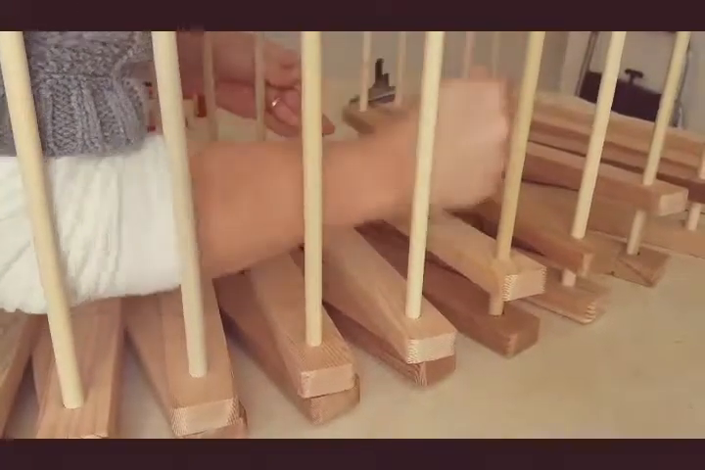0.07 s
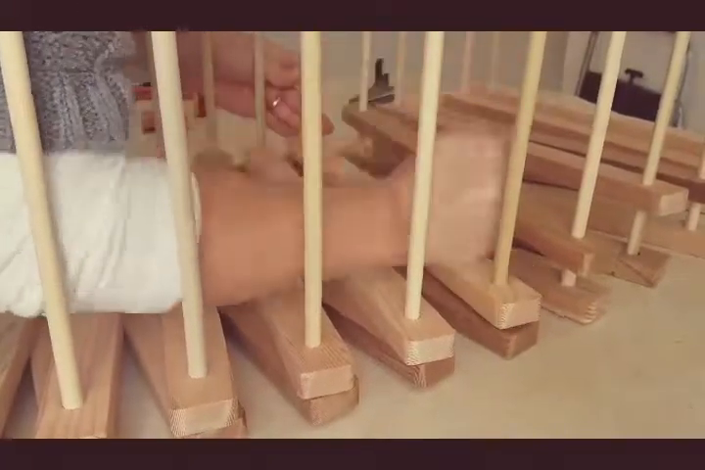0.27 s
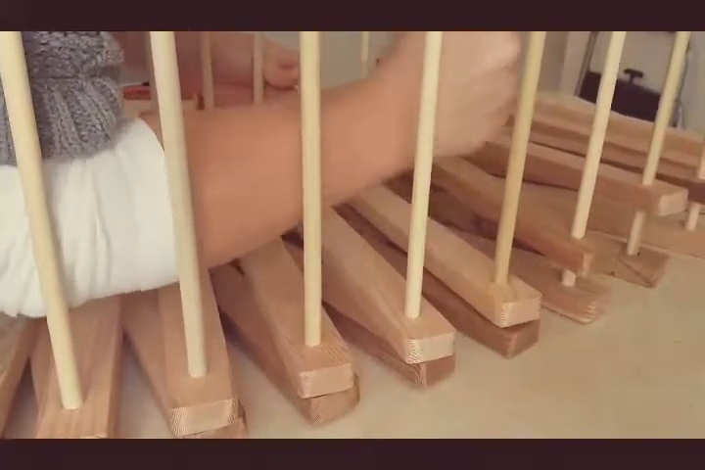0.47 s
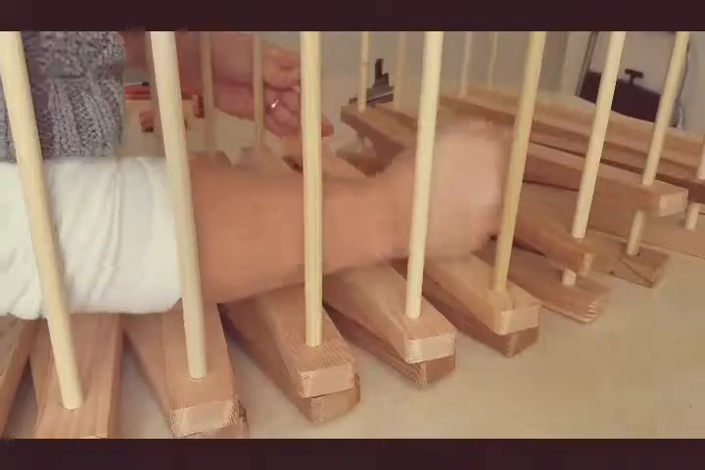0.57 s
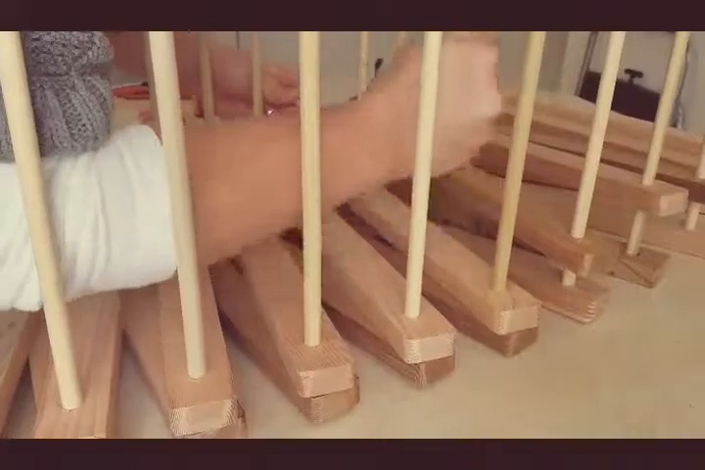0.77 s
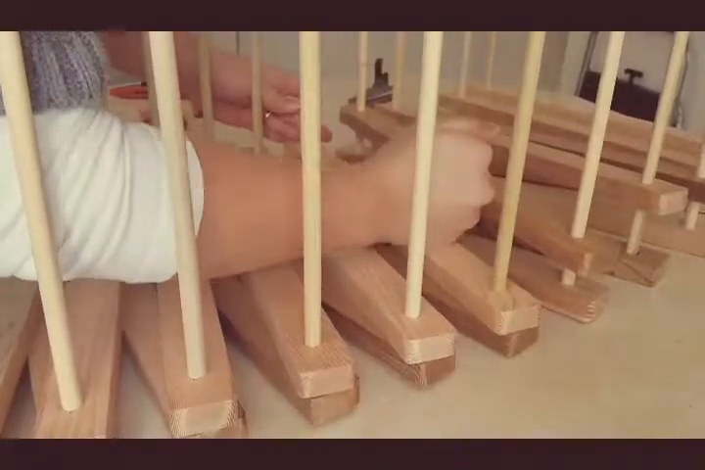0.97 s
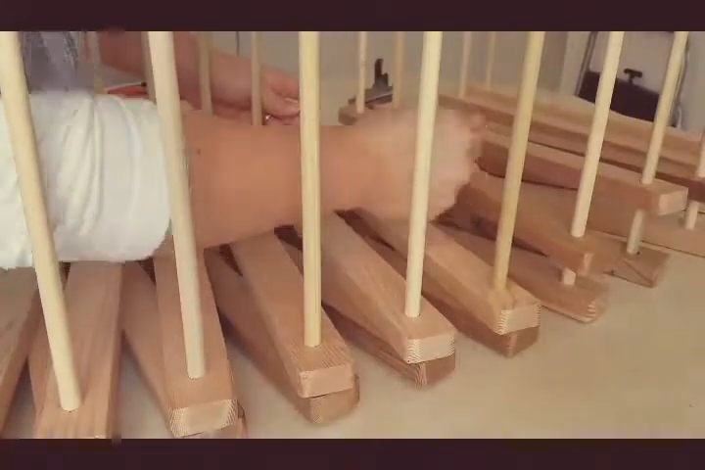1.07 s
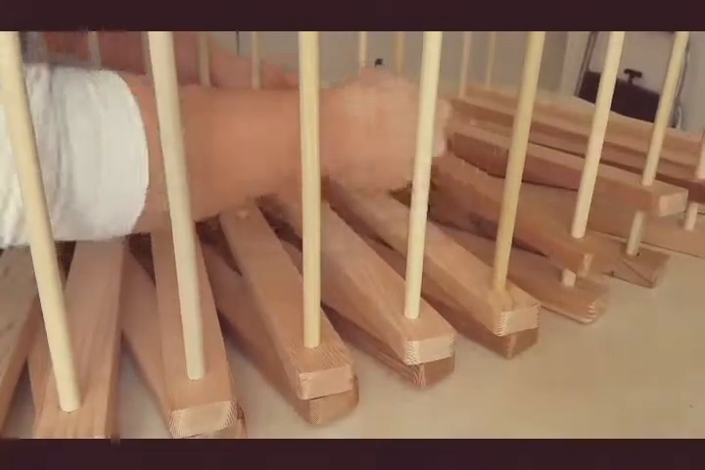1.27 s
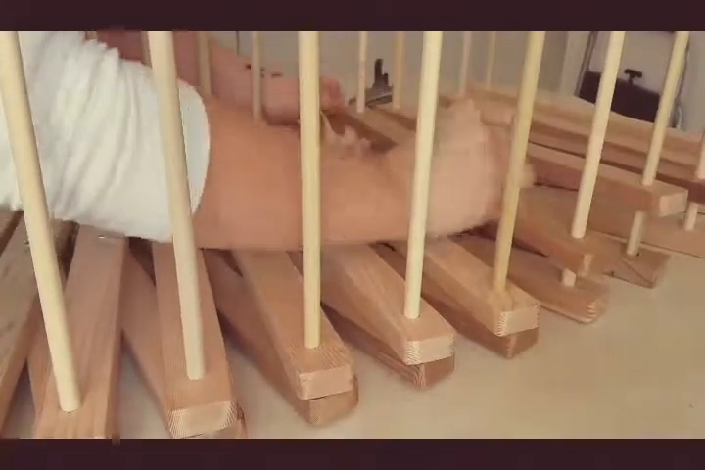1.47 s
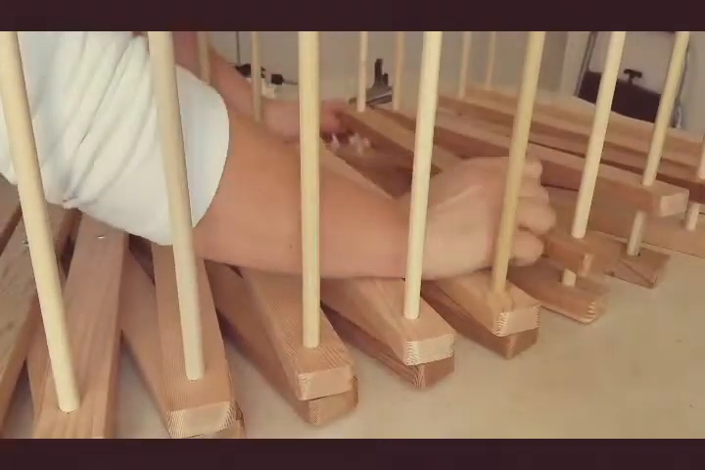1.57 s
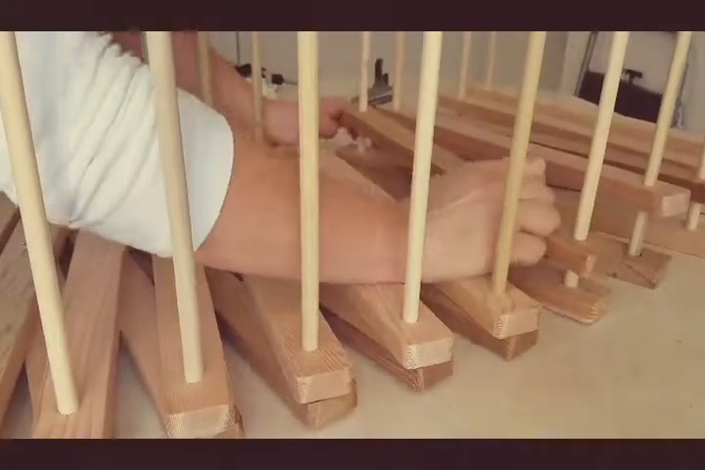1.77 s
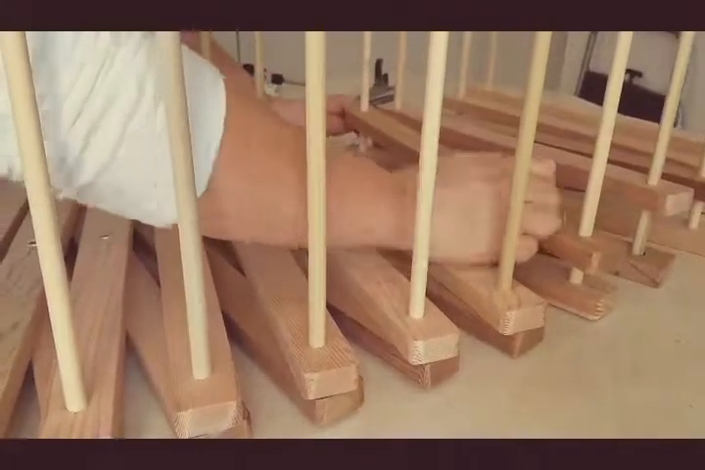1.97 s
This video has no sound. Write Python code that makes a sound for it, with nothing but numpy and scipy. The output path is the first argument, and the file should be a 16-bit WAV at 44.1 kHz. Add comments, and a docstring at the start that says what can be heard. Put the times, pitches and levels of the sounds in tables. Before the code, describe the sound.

Hard wooden clacks of bars knocked into place on a bench. A faint knock tail, soft rubbing and tiny metal clink open the moment. Sharp, hollow blows land at 0.24, 0.50, 0.72 and 1.01 seconds, the middle two loudest, the fourth brighter. A duller, fumbled cluster comes at 1.31-1.36. Near quiet follows, with barely audible touches, then slight sliding at 2.0 and a soft knock at 2.03. Close stereo, small live room.

```python
"""Wooden rack arms knocked into place

Wooden rack arms are knocked into place on a workbench in a small, live workshop: four sharp clacks and
a duller, fumbled knock, with fainter blows around them. Each blow is a snap, a short noise crack, ringing
modes of the arms and bench top, and a dense noise wash. A small metal fitting clinks as a set of decaying
sines; shifted parts slide and brush as coloured noise over the quiet room."""
import sys
import numpy as np
from scipy import signal
from scipy.fft import rfft, irfft, next_fast_len
from scipy.io import wavfile
from scipy.ndimage import uniform_filter1d

SR = 44100
rng = np.random.default_rng(int(sys.argv[2]) if len(sys.argv) > 2 else 0)


def wrap_up_sound(samples):
    """Save the sound to the file named by the first command line argument, as 16-bit audio."""
    columns = np.atleast_2d(samples).T
    # keep every value between -1 and 1, then stretch to whole-number steps
    tamed = np.clip(columns, -1, 1)
    steps = np.round(tamed * 32767).astype(np.int16)
    wavfile.write(sys.argv[1], SR, steps)


N = 90405

# Blows on the rack. Each row: start in seconds, level in dB, then bass, low mids, upper mids, treble and
# top in dB against the body, crack in dB against the wash, ring length as a factor.
KNOCKS = [(-.04, -31, -4, 10.5, 1.5, 3, 1, -11, 0.95), (.028, -38, 6, 9.5, 6, 21, 7.5, -12, 1.2),
          (0.2425, 0.5, -2.5, 4.5, -1.1, -4.5, -0.5, 0.5, 0.98),
          (0.5014, 3.5, -4, 2.6, -4, -6.5, -8.5, 1.5, 0.88), (0.7241, 3, 1.5, -2, -2.7, -4.9, -3, -2, 0.95),
          (1.0088, -2.5, -3, 1, 7.5, 6.5, 9.5, -0.5, 0.92), (1.3127, -23.5, 3, 1, 5, 6, 4, -15, 0.6),
          (1.3204, -8, -1, 1.5, 1.5, -9, -5, -11, 0.92), (1.3274, -12, 13.5, 5.5, -6, -8, -14, 8, 0.75),
          (1.3631, -22.5, 12.5, 5.5, 3.5, -6, -8, 10, 0.57),
          (1.593, -42.5, 14.5, 14, -10, -9.5, -7.5, -3, 0.91), (1.647, -48, 12, 2, -5, -5, -3, -7, 1.6),
          (2.034, -17, 7, 2.5, -3.5, -16, -10.5, -6.3, 0.58)]
# Tone centres of a blow, in Hz: bass, low mids, body, upper mids, treble, top.
COLOUR_HZ = [125, 250, 500, 1800, 4500, 11000]
# Ringing of the arms and the bench top. Each row: pitch in Hz, level in dB, t60 in seconds at ring length 1.
WOOD_MODES = [(127, -16, 0.31), (161.1, -25, 0.37), (261.8, -20, 0.2), (342.3, -19, 0.24),
              (381.1, -24, 0.47), (473, -19, 0.38), (530.8, -17.5, 0.38), (566, -19.5, 0.22),
              (649.3, -16, 0.25), (719, -20, 0.34), (799, -18.5, .23), (924, -26, .27), (961, -29, .4),
              (1768, -32, .34), (2203, -32, 0.24), (2354, -31, .3)]
# Dense wash of higher modes and room. Each row: frequency in Hz, gain in dB.
WASH = [(30, 4), (60, -1.5), (95, 24), (150, 16), (210, 27.5), (320, 31.5), (430, 18), (580, 35), (850, 28),
        (1200, 25.5), (1600, 22.5), (2300, 21.5), (3000, 12), (4800, 7.5), (7000, -4), (10000, -2),
        (14500, -17)]
# Decay of the wash. Each row: frequency in Hz, t60 in seconds at ring length 1.
WASH_T60 = [(60, 0.95), (160, 0.47), (420, 0.38), (1100, 0.41), (2400, 0.38), (4000, 0.3), (8000, .33),
            (14000, 0.11)]
# Crack of the contact itself. Each row: frequency in Hz, gain in dB.
CRACK = [(100, 11.5), (400, 28), (800, 19.5), (1300, 20.5), (2200, 10.5), (4000, 5), (8000, -9.5),
         (14000, -12)]
# Stereo likeness. Each row: frequency in Hz, left-right correlation from -1 to 1.
LIKENESS = [(60, 1), (140, 0.96), (260, 0.99), (550, 0.71), (1000, 0.22), (2000, -0.06), (4000, 0.13),
            (12000, -0.055)]
# Stereo balance. Each row: frequency in Hz, left minus right in dB.
BALANCE_DB = [(60, -2.5), (300, -3), (650, -0.5), (1000, -1.5), (2000, 3.5), (4000, 0.7), (12000, 0.7)]
# Touches on the fitting. Each row: start in seconds, level in dB, loss in dB per octave away from its
# main mode (a negative loss is a lift).
CLINKS = [(.033, -46, -5), (1.840, -62.5, 12)]
# Ringing of the metal fitting. Each row: pitch in Hz, level in dB, t60 in seconds.
FITTING_MODES = [(740, 3, 0.15), (954, -7, 0.25), (1680, -4.5, 0.4), (1760, -9.5, 0.34), (2275, -6.5, .12),
                 (2420, -3, .14), (2290, 7, 0.32), (3180, -7, .12), (4000, -6, 0.14), (4460, -17, 0.11),
                 (4740, -6, 0.19)]
# Wood sliding on wood. Each row: time in seconds, level in dB.
SLIDE = [(0, -62), (.045, -40), (.13, -82), (.23, -56.5), (.3, -53), (1.55, -65), (1.66, -66.5),
         (1.8, -62.5), (1.95, -68.5), (1.99, -53.5), (2.025, -44.5), (2.05, -53)]
# Tone of the slide. Each row: frequency in Hz, relative density in dB per Hz.
SLIDE_COLOUR = [(30, -11), (200, 4), (700, -3), (1400, -9), (2500, -9), (4000, -14.5), (7000, -28.5),
                (12000, -18.5), (15000, -29.5)]
# A light, high brushing. Each row: time in seconds, level in dB.
BRUSH = [(0, -59), (.07, -52), (.14, -69.5), (.22, -64), (.38, -68), (.46, -61), (.52, -80), (1.95, -91.5),
         (1.99, -68), (2.05, -62)]
# Tone of the brushing. Each row: frequency in Hz, relative density in dB per Hz.
BRUSH_COLOUR = [(30, -17.5), (2000, -16), (4500, 2.5), (7500, 2.5), (10000, 1.5), (14500, 3)]
# Tone of the quiet room. Each row: frequency in Hz, relative density in dB per Hz.
FLOOR = [(30, -12), (80, -1), (130, 9), (200, 1.5), (400, -17.5), (1000, -13), (2400, -18), (4000, -30.5),
         (14000, -30.5)]

FLOOR_DB = -60  # rms
FITTING_MAIN_HZ = 2450
LOW_CUT_HZ, CUTOFF_HZ = 26, 14900
MODE_BUILD_CYCLES, WASH_BUILD_CYCLES = 0.52, 0.29
MODE_SCATTER_DB = 1.8  # random spread of mode levels from blow to blow
MODE_WIDTH = 0.35  # how far the phases at the two microphones part
TYPICAL_T60_S = 0.4  # the decay that a ring length scales
CRACK_T60_S = 0.0023
CRACK_CYCLES = 15  # every band of the crack lasts this many cycles longer, so low notes hang on most
EVEN_OVER_HZ = 22  # width over which the wash is evened out
SNAP_DB = -2
SNAP_LOW_HZ, SNAP_HIGH_HZ, SNAP_DULL_HZ = 750, 2260, 6500
SNAP_FULL_DB, SNAP_SOFTENING = -2, 0.6  # below this level a blow loses this many more dB of snap per dB
SNAP_LAG_S = 0.0001  # the left microphone hears it later

T = np.arange(N) / SR
TAIL = T[:int(0.55 * SR)]  # time axis of one ringing sound

# third-octave bands, and their power responses for the evened wash
EDGES = 28 * 2 ** (np.arange(29) / 3)
CENTRES = np.sqrt(EDGES[1:] * EDGES[:-1])
BANDS = [signal.butter(2, EDGES[k:k + 2], "band", fs=SR, output="sos") for k in range(len(CENTRES))]
FFT_SIZE = next_fast_len(len(TAIL) + SR // 8, True)
FFT_HZ = np.fft.rfftfreq(FFT_SIZE, 1 / SR)
BAND_SHAPES = [np.abs(signal.sosfreqz(sos, FFT_HZ, fs=SR)[1]) ** 2 for sos in BANDS]


def from_db(db):
    """Decibels to gain."""
    return 10 ** (np.asarray(db) / 20)


def at_hz(points, hz):
    """Read a table on a log-frequency axis."""
    f, v = np.transpose(points)
    return np.interp(np.log(hz), np.log(f), v)


def panned(db):
    """Left and right gains for a level difference."""
    return from_db(np.array([[db], [-db]]) / 2)


def unit(x):
    """Scale to energy 1."""
    return x / np.sqrt(np.sum(x ** 2) + 1e-20)


def dying(t60):
    """Exponential decay: 60 dB down after t60 seconds."""
    return np.exp(-np.log(1000) * TAIL / t60)


def swelling(hz, cycles):
    """A resonance builds up over a time set in cycles of its pitch."""
    return 1 - np.exp(-TAIL * hz / cycles)


def add(out, start_s, sound):
    """Mix a sound in at a time, trimmed to the scene."""
    i = int(round(start_s * SR))
    a, b = max(i, 0), min(i + sound.shape[-1], N)
    if b > a:
        out[:, a:b] += sound[:, a - i:b - i]


def band_noise(k, size):
    """Two unrelated noises in third-octave band k."""
    steep_band = np.vstack([BANDS[k], BANDS[k]])
    settling = SR // 8
    noise = rng.standard_normal((2, size + settling))
    return signal.sosfilt(steep_band, noise)[:, -size:]


def stereo(pair, hz):
    """Turn two noises into left and right, alike in the bass and mostly unrelated in the treble."""
    alike = np.clip(at_hz(LIKENESS, hz), -0.99, 0.99)
    mid = np.sqrt((1 + alike) / 2) * unit(pair[0])
    side = np.sqrt((1 - alike) / 2) * unit(pair[1])
    return np.array([mid + side, mid - side]) * panned(at_hz(BALANCE_DB, hz))


def ring(hz, t60, spread):
    """One decaying mode, reaching the two microphones in different phases."""
    parting = spread * rng.choice([-1, 1]) * np.array([[1], [-1]])
    phase = rng.uniform(0, 2 * np.pi) + parting
    return np.sin(2 * np.pi * hz * TAIL + phase) * dying(t60) * swelling(hz, MODE_BUILD_CYCLES)


def hiss(bands, colour):
    """Steady stereo noise of a given colour, rms 1 over both channels."""
    band_gains = from_db(at_hz(colour, CENTRES)) * np.sqrt(CENTRES)  # wider bands hold more energy
    return unit(np.tensordot(band_gains, bands, 1)) * np.sqrt(2 * N)


def background():
    """Soft friction noise as parts are shifted, over the quiet room."""
    bands = np.array([stereo(band_noise(k, N), hz) for k, hz in enumerate(CENTRES)])
    # one noise serves three layers: played backwards, shifted by half, and straight
    slide_noise = hiss(bands, SLIDE_COLOUR)[:, ::-1]
    brush_noise = np.roll(hiss(bands, BRUSH_COLOUR), N // 2, axis=1)
    slide = from_db(np.interp(T, *np.transpose(SLIDE))) * slide_noise
    brush = from_db(np.interp(T, *np.transpose(BRUSH))) * brush_noise
    return slide + brush + from_db(FLOOR_DB) * hiss(bands, FLOOR)


def fitting():
    """Light touches ring a small metal part; the lightest wakes little but the modes near its main one."""
    out = np.zeros((2, N))
    for start_s, db, loss_db in CLINKS:
        for hz, mode_db, t60 in FITTING_MODES:
            octaves_away = abs(np.log2(hz / FITTING_MAIN_HZ))
            gain = from_db(db + mode_db - loss_db * octaves_away)
            add(out, start_s, gain * ring(hz, t60, spread=0.35))
    return out


def strength(knock, hz):
    """How strongly a blow drives a frequency: hard contacts are bright, soft ones boom."""
    _, db, bass_db, low_mids_db, upper_mids_db, treble_db, top_db, _, _ = knock
    colour_db = [bass_db, low_mids_db, 0, upper_mids_db, treble_db, top_db]
    return from_db(db + np.interp(np.log(hz), np.log(COLOUR_HZ), colour_db))


def damping(length):
    """Change in decay for a part held more or less firmly: below 1 rings shorter, above 1 longer."""
    return dying(TYPICAL_T60_S) ** (1 / np.clip(length, 0.4, 1.5) - 1)


def evened(pair, k):
    """Spread a band's energy evenly over its pitches, so that no chance note stands out."""
    spectrum = rfft(pair, FFT_SIZE)
    width = int(EVEN_OVER_HZ * FFT_SIZE / SR)
    power = uniform_filter1d(np.abs(spectrum) ** 2, size=width, axis=-1)
    level = np.sqrt(np.abs(power) + 1e-9 * power.max())
    return irfft(spectrum * BAND_SHAPES[k] / level, FFT_SIZE)[:, :len(TAIL)]


def burst(k, envelope, even=False):
    """Stereo noise in band k under an envelope, with energy in proportion to the bandwidth."""
    pair = band_noise(k, len(TAIL)) * envelope
    if even:
        pair = evened(pair, k) * swelling(CENTRES[k], WASH_BUILD_CYCLES)
    bandwidth = EDGES[k + 1] - EDGES[k]
    return np.sqrt(2 * bandwidth / SR) * stereo(pair, CENTRES[k])


def wash():
    """Dense modes dying in the room, band by band."""
    bands = []
    for k, hz in enumerate(CENTRES):
        bands.append(from_db(at_hz(WASH, hz)) * burst(k, dying(at_hz(WASH_T60, hz)), even=True))
    return np.array(bands)


def contact_crack():
    """The brief noise of the contact itself, band by band, with the low bands lasting longest."""
    bands = []
    for k, hz in enumerate(CENTRES):
        envelope = dying(CRACK_T60_S + CRACK_CYCLES / hz) * swelling(hz, MODE_BUILD_CYCLES)
        bands.append(from_db(at_hz(CRACK, hz)) * burst(k, envelope))
    return np.array(bands)


def wood_clatter(count=5):
    """Each blow is a short crack and a wash that differs between a few striking places."""
    out = np.zeros((2, N))
    places = [wash() for _ in range(count)]
    crack = contact_crack()
    for i, knock in enumerate(KNOCKS):
        crack_db, length = knock[-2:]
        gains = strength(knock, CENTRES)
        washed = np.tensordot(gains, places[i % count], 1) * damping(length)
        cracked = from_db(crack_db) * np.tensordot(gains, crack, 1)
        add(out, knock[0], washed + cracked)
    return out


def wood_modes():
    """Every blow rings the same modes of the arms and bench top, with strengths of its own."""
    out = np.zeros((2, N))
    pitches = np.array(WOOD_MODES)[:, 0]
    spreads = MODE_WIDTH * np.arccos(np.clip(at_hz(LIKENESS, pitches), -1, 1))
    rings = []
    for (hz, db, t60), spread in zip(WOOD_MODES, spreads):
        rings.append(from_db(db) * panned(at_hz(BALANCE_DB, hz)) * ring(hz, t60, spread))
    rings = np.array(rings)
    for knock in KNOCKS:
        scatter = from_db(MODE_SCATTER_DB * rng.standard_normal(len(pitches)))
        gains = strength(knock, pitches) * scatter
        add(out, knock[0], np.tensordot(gains, rings, 1) * damping(knock[-1]))
    return out


def wood_snaps():
    """The direct sound of hard wood meeting hard wood: one brief filtered pulse a blow."""
    out = np.zeros((2, N))
    click = (TAIL == 0) * 1.0
    band = signal.butter(1, [SNAP_LOW_HZ, SNAP_HIGH_HZ], "band", fs=SR, output="sos")
    dull = signal.butter(1, SNAP_DULL_HZ, fs=SR, output="sos")
    pulse = signal.sosfilt(dull, signal.sosfilt(band, click))
    for start_s, db, _, _, _, treble_db, _, crack_db, _ in KNOCKS:
        softening_db = SNAP_SOFTENING * min(db - SNAP_FULL_DB, 0)
        snap = from_db(SNAP_DB + db + treble_db + crack_db + softening_db) * pulse[None]
        add(out[:1], start_s + SNAP_LAG_S, snap)
        add(out[1:], start_s, snap)
    return out


def knocks():
    """Snap, modes and clatter together; the parts are too small to radiate deep bass."""
    low_cut = signal.butter(3, LOW_CUT_HZ, "high", fs=SR, output="sos")
    return signal.sosfilt(low_cut, wood_snaps() + wood_modes() + wood_clatter())


def scene():
    """Knocks, clinks and rubbing over the quiet room."""
    return knocks() + fitting() + background()


def record(dry):
    """The highest peaks are rounded and the top is cut."""
    rounded = dry / (1 + (dry / 0.95) ** 6) ** (1 / 6)
    top_cut = signal.ellip(10, 0.2, 70, CUTOFF_HZ, fs=SR, output="sos")
    return signal.sosfilt(top_cut, rounded)


dry = scene()
out = record(dry)
wrap_up_sound(out)
```